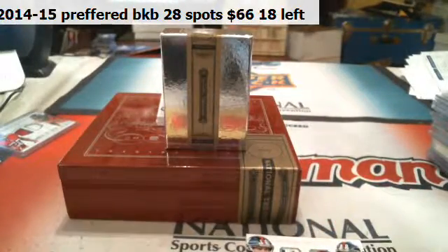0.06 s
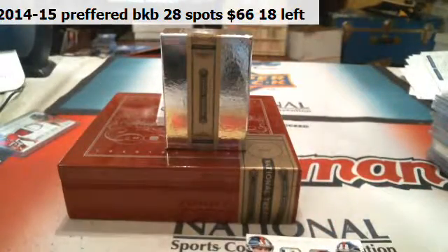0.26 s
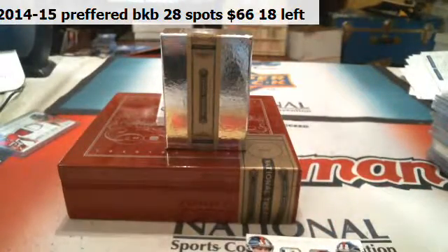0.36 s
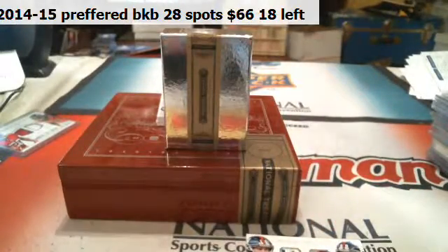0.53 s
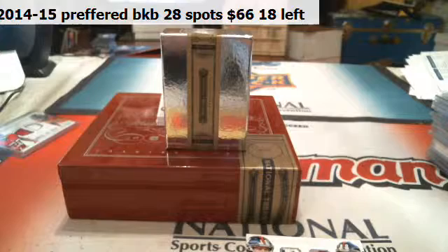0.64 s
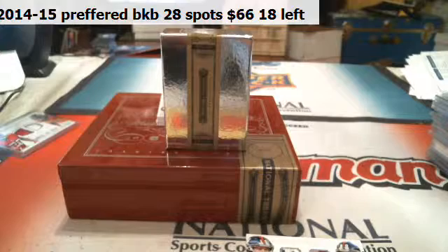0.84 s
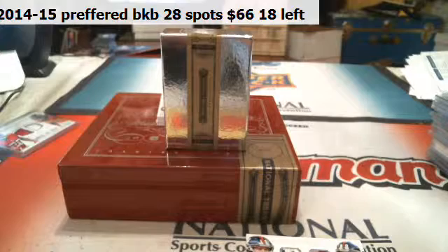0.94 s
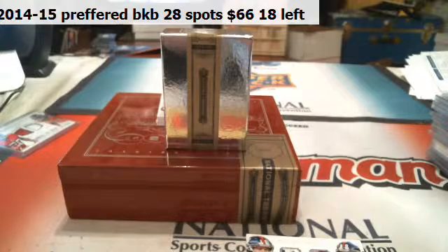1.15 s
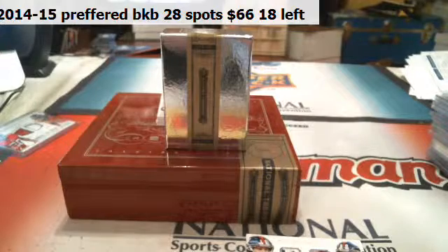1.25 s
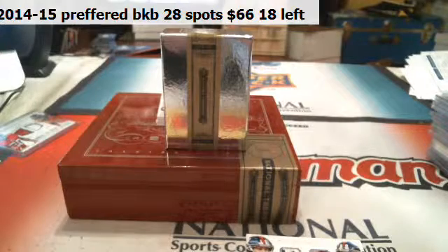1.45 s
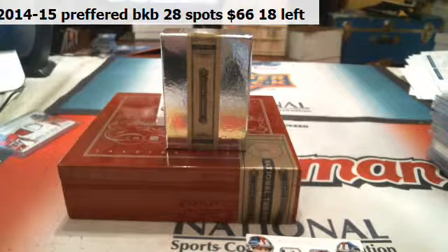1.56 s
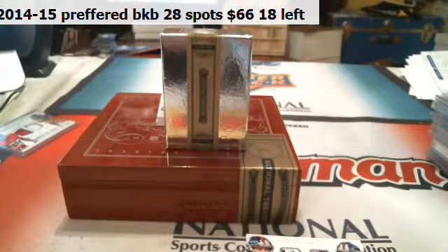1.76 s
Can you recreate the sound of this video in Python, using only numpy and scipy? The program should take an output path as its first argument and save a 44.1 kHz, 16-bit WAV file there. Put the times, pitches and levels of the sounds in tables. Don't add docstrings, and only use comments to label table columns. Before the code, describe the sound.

Thin plastic card sleeves crackle and snap as a hand shuffles them close up indoors

```python
import sys
import numpy as np
from scipy import signal
from scipy.fft import rfft, irfft
from scipy.io import wavfile

SR = 44100
rng = np.random.default_rng(int(sys.argv[2]) if len(sys.argv) > 2 else 0)


def wav_record(signal):
    frames = np.transpose(np.atleast_2d(signal))
    bounded = np.clip(frames, -1, 1)
    quanta = np.round(bounded * 32767).astype(np.int16)
    wavfile.write(sys.argv[1], SR, quanta)


def natural_amplitude(level_db):
    exponent = np.asarray(level_db, float) / 20
    return 10 ** exponent


N = 79380

# start_s, end_s
STROKE_TIMES = [(-.01, .012), (.14, .165), (.207, .26), (.26, .33), (.357, .438), (.438, .49), (.504, .533),
                (.535, .615), (.615, .66), (.71, .79), (.833, .88), (.88, .912), (.971, .99), (.99, 1.125),
                (1.124, 1.17), (1.17, 1.33), (1.33, 1.42), (1.423, 1.461), (1.5, 1.52), (1.532, 1.598),
                (1.6, 1.65), (1.786, 1.8), (.124, .14), (.165, .2)]
# pressure_at_start_db, pressure_at_end_db, lowest_ring_of_bent_sheet_hz
STROKE_FEEL = [(-38.5, -60, 214), (-51.5, -58, 660), (-58, -57, 2400), (-75.5, -58, 250),
               (-59.5, -41.5, 550), (-32, -42.5, 307), (-34.5, -38.5, 330), (-38, -59.5, 1300),
               (-72, -73, 2100), (-59.5, -64.5, 6300), (-60.5, -59.5, 1170), (-61.5, -65, 290),
               (-68, -63.5, 1400), (-60.5, -55, 1600), (-42.5, -48.5, 660), (-47, -50.5, 850),
               (-51.5, -51.5, 770), (-36, -57.5, 630), (-80, -58, 2600), (-39.5, -62, 2440),
               (-77, -85, 2500), (-74.5, -60.5, 470), (-74, -61, 1200), (-65, -70, 3000)]
RUB_DB = -5
TOP_HZ = 9980


def rms_one(x):
    return x / np.sqrt(np.mean(x ** 2) + 1e-20)


def peak_one(x):
    return x / np.abs(x).max()


def at_hz(points, hz):
    point_hz, point_db = np.array(points).T
    return np.interp(np.log(hz), np.log(point_hz), point_db)


def drift(rate_hz):
    r = np.exp(-2 * np.pi * rate_hz / SR)
    noise = rng.standard_normal(N + 4000)
    return rms_one(signal.lfilter([1], [1, -2 * r, r * r], noise)[4000:])


def resonate(x, hz, width_hz):
    r = np.exp(-np.pi * width_hz / SR)
    feed = np.array([1, 0, -1]) * (1 - r * r) / 2
    ring = [1, -2 * r * np.cos(2 * np.pi * hz / SR), r * r]
    return signal.lfilter(feed, ring, x + 1e-18)


def cut(x, hz, kind):
    return signal.sosfilt(signal.butter(2, hz, kind, fs=SR, output="sos"), x)


def snaps():
    # start_s, peak_db, ring_hz, treble_db, body_db
    film_snaps = [(0.141, -44, 1510, -14, -1), (0.153, -43.5, 837, -57, 11),
                  (0.207, -31, 3936, -28, -72), (0.231, -27.5, 7940, 4, -36),
                  (0.244, -34, 7400, 12, -15), (0.26, -38, 1240, -33, -8),
                  (0.283, -44.5, 2960, -14, -31), (0.291, -37.5, 6500, -23, -8.5),
                  (0.31, -45.5, 1140, 2, -62), (0.356, -34.5, 2530, -10.5, -4),
                  (0.365, -72, 5270, -12, -28.5), (0.376, -64.5, 2250, -22, -14),
                  (0.388, -31.5, 4500, -15, -10), (0.404, -30.5, 670, -5.5, 7),
                  (0.414, -34, 1750, -3.5, 3), (0.432, -29.5, 3830, -23.5, 11),
                  (0.443, -15.5, 3800, -22, 14.5), (0.443, -23.5, 1850, -7.5, -28.5),
                  (0.503, -18, 4660, -49, -35), (0.515, -28, 4600, -13, -4),
                  (0.518, -18.5, 2830, 7.5, 13), (0.522, -31, 504, 10.5, -32.5),
                  (0.5397, -24.5, 1860, -1.5, -34.5), (0.551, -26.5, 4800, 15, 6),
                  (0.5758, -21, 7030, -13, -17), (0.589, -33.5, 8300, -20, -4),
                     (0.595, -33.5, 850, 12.5, 11), (0.633, -40, 1770, 6, -18), (0.712, -45, 6840, 5, 1.5),
                     (0.748, -41.5, 2490, -5, -41), (0.772, -42.5, 7660, -33, -12),
                     (0.833, -50.5, 2310, -24, -1), (0.846, -39, 1175, 3.5, -3),
                     (0.873, -41.5, 2250, -7, -14), (0.973, -59, 4650, -22, -30),
                     (0.992, -41, 2000, 1, 4.5), (1.019, -46.5, 2050, -0.5, -13),
                     (1.035, -38, 770, -11, 12), (1.051, -47, 2070, -33, -32),
                     (1.058, -37.5, 2100, -9, -30), (1.077, -40.5, 2090, -24, -32.5),
                     (1.091, -37.5, 2100, -2.5, -11), (1.117, -39, 2220, -35.5, -16),
                     (1.126, -42, 2120, -36, 4), (1.145, -31.5, 2100, -39.5, 23),
                     (1.157, -27.5, 3380, -42, -3), (1.166, -38, 1450, -10.5, -18),
                     (1.181, -44, 8450, -13, -46),
                  (1.191, -20, 8670, 30, -35), (1.203, -31.5, 1600, -21.5, 11),
                      (1.218, -41, 1670, -16, -4), (1.23, -26.5, 7400, 14, -34),
                      (1.243, -29.5, 2150, -4, -4.5), (1.267, -35, 5840, -5, -32),
                      (1.284, -25, 5400, 8, -36), (1.3, -26, 1740, -38, 8), (1.312, -23, 2980, -43, 5.5),
                      (1.349, -37.5, 4740, -18, -2), (1.359, -30.5, 2220, -28, 2),
                      (1.365, -35, 3060, -12, 5), (1.423, -32, 2200, -0.5, -20),
                      (1.449, -34.5, 2970, -21, 3), (1.5, -42.5, 1580, 12, -21),
                      (1.534, -33, 1900, -2, -30), (1.544, -35, 5750, -37, -39),
                      (1.553, -34, 5500, -37, -44), (1.565, -34.5, 2300, -49, -44),
                      (1.584, -44, 2470, -36, -41), (1.592, -36.5, 2820, -13.5, -25)]
    decay_s, hold_s, after_db, after_s = .003, .0055, -17, .012
    clicks_per_s, fizz, first_click = 3000, .25, 2.0
    ring_q, body_hz, treble_hz = 5.56, 906, 4650
    broad_db, all_treble_db, all_body_db = 3.5, 10.5, 6.5
    creep_s = .0008
    size = 2048
    out = np.zeros(N + size)
    t = np.arange(size) / SR
    shape = np.exp(-t / decay_s - (t / hold_s) ** 4) + natural_amplitude(after_db) * np.exp(-t / after_s)
    for start_s, db, hz, treble_db, body_db in film_snaps:
        clicks = rng.random(size) < clicks_per_s / SR
        flurry = rng.standard_normal(size) * (fizz + clicks) * shape
        flurry[3] += first_click
        ring = resonate(resonate(flurry, hz, hz / ring_q), hz, 2 * hz / ring_q)
        band = [0.57 * hz, min(3.01 * hz, 15000)]
        broad = cut(cut(flurry, band, "band"), band, "band")
        treble = cut(flurry, [treble_hz, 1.2 * TOP_HZ], "band")
        body = resonate(flurry, body_hz, 1.48 * body_hz)
        snap = peak_one(ring) + natural_amplitude(broad_db) * peak_one(broad)
        snap = snap + natural_amplitude(all_treble_db + treble_db) * peak_one(treble)
        snap = snap + natural_amplitude(all_body_db + body_db) * peak_one(body)
        i = int((start_s + creep_s) * SR)
        out[i:i + size] += natural_amplitude(db) * peak_one(snap)
    return out[:N]


def pressure(t, start_s, end_s, start_db, end_db):
    grip_s, let_go_db_per_s = .004, 596
    grip = np.clip((t - start_s) / grip_s, 0, 1)
    hold_db = np.interp(t, [start_s, end_s], [start_db, end_db])
    return grip * natural_amplitude(hold_db - let_go_db_per_s * np.maximum(t - end_s, 0))


def fingers(hz):
    # pitch_hz, level_db
    film_colour = [(150, -40), (250, -3), (544, -13), (961, -13), (1790, -5), (3330, -3), (4470, -2),
                   (9230, 0), (15500, -36)]
    below_db_per_oct, above_db_per_oct, sheet_ring_db = 14.5, 4.5, -1.5
    hop = 16
    t, power = np.arange(0, N, hop) / SR, 0
    film = natural_amplitude(at_hz(film_colour, hz)) * np.sqrt(hz)
    for (start_s, end_s), (start_db, end_db, sheet_hz) in zip(STROKE_TIMES, STROKE_FEEL):
        gain = pressure(t, start_s, end_s, start_db, end_db)
        octaves = np.log2(hz / sheet_hz)
        slope_db = np.where(octaves < 0, below_db_per_oct, -above_db_per_oct) * octaves
        sheet = natural_amplitude(slope_db + sheet_ring_db * np.exp(-(octaves / 0.16) ** 2))
        power = power + np.outer(rms_one(sheet * film), gain) ** 2
    return np.repeat(np.sqrt(power), hop, axis=1)[:, :N]


def rustle():
    grains_per_s, grain_spread_db, grain_cycles = 5000, 2.8, 8.0
    clumps_per_s, clump_db = 70, 5
    pitches = np.geomspace(280, 14500, 24)
    gains = fingers(pitches)
    sizes = natural_amplitude(grain_spread_db * np.minimum(rng.exponential(1, N), 4)) * rng.choice([-1, 1], N)
    clump = drift(clumps_per_s)
    born = rng.random(N) < grains_per_s * natural_amplitude(clump_db * clump) / SR
    dealt = rng.integers(0, 24, N)
    bed = rng.standard_normal((2, N))
    out = 0
    for k, hz in enumerate(pitches):
        near = np.abs(dealt - k) < 2
        creases = sizes * born * near + 0.14 * bed[k % 2]
        width_hz = 4.18 * hz / grain_cycles
        grains = rms_one(resonate(resonate(creases, hz, width_hz), hz, width_hz))
        out = out + grains * gains[k] * natural_amplitude(2.0 * drift(28))
    return natural_amplitude(RUB_DB - 12.0) * out


def singing():
    # ring_hz, level_above_crackle_db
    sheet_songs = [(420, -7), (1400, -11), (1400, -12), (1220, 0), (1700, -10), (1753, -3.5), (482, -7.5),
                   (900, -7), (1700, -3), (2400, -5.5), (2200, -3), (764, -3.5), (4600, -2), (2100, -2),
                   (2100, -7.5), (2100, -8), (2300, -9), (1770, -10), (1650, -29), (2300, -1), (3120, -10),
                   (1200, -19), (4420, -3), (4000, -10)]
    ring_q = 7.0
    t, out = np.arange(N) / SR, 0
    slips = rng.standard_normal(N) * natural_amplitude(3.5 * drift(110))
    for (start_s, end_s), (start_db, end_db, _), (hz, db) in zip(STROKE_TIMES, STROKE_FEEL, sheet_songs):
        ring = rms_one(resonate(resonate(slips, hz, hz / ring_q), hz, 2 * hz / ring_q))
        out = out + natural_amplitude(RUB_DB + db) * pressure(t, start_s, end_s, start_db, end_db) * ring
    return out


def ticks():
    # start_s, peak_db, ring_hz
    kinks = [(.004, -56.5, 380), (.216, -64, 1400), (0.2337, -51, 6750), (0.236, -38, 7800),
             (0.284, -50.5, 1200), (0.292, -58, 1400), (0.314, -61, 308), (.329, -71, 1200),
             (0.336, -55, 1310), (.364, -55, 407), (.366, -40, 3600), (0.376, -50, 2350),
             (0.518, -36.5, 328), (.586, -52, 820), (.604, -48, 970), (.614, -52, 750), (.648, -63, 1700),
             (0.658, -55, 7130), (.671, -66, 2200), (.749, -59, 1080), (0.767, -57.5, 1120),
             (.786, -57, 2400), (0.837, -64.5, 537), (.892, -53.5, 710), (.899, -55.5, 1930),
             (.948, -64, 7700), (0.997, -53, 1400), (1.001, -50, 1970), (1.01, -50, 1520),
             (1.018, -52, 735), (1.029, -51, 2100), (1.067, -61, 2100), (1.105, -53, 2100),
             (1.146, -47.5, 280), (1.196, -50, 586), (1.205, -51, 532), (1.271, -47, 1700),
             (1.286, -46, 2100), (1.322, -55, 1510), (1.346, -41.5, 1700), (1.385, -57, 776),
             (1.425, -37.5, 1860), (1.434, -45, 980), (1.446, -53.5, 650), (1.458, -47, 2500),
             (1.51, -66, 1580), (1.533, -49.5, 1306), (1.541, -56.5, 420), (1.556, -39.5, 2880),
             (1.638, -59.5, 3180), (1.68, -64, 565), (1.686, -53.5, 531), (1.705, -57.5, 515),
             (1.714, -68, 1987), (.152, -54, 900)]
    puff_s, ring_q, widens_hz = 0.00091, 4.5, 4000
    swell_cycles = 1.2
    size = 2048
    out = np.zeros(N + size)
    t = np.arange(size) / SR
    for start_s, db, hz in kinks:
        puff = (1 + rng.standard_normal(size)) * np.exp(-t / puff_s) * np.cos(2 * np.pi * hz * t)
        width_hz = hz / ring_q * (1 + hz / widens_hz)
        tick = resonate(resonate(puff, hz, width_hz), hz, 2 * width_hz)
        i = max(int((start_s - swell_cycles / hz) * SR), 0)
        out[i:i + size] += natural_amplitude(db) * peak_one(tick)
    return out[:N]


def room(x):
    level_db, t60_s, gap_s = -15, .12, .004
    t = np.arange(SR // 4) / SR
    tail = rng.standard_normal(len(t)) * natural_amplitude(-60 * t / t60_s) * (t > gap_s)
    tail = tail / np.sqrt(np.sum(tail ** 2))
    return natural_amplitude(level_db) * signal.fftconvolve(x, tail)[:N]


def air():
    # pitch_hz, level_db (per Hz)
    air_colour = [(30, -8.5), (70, 3), (250, 8), (330, 6), (450, -4.5), (1500, -8.5), (6000, -23.5),
                  (14000, -28.5)]
    air_db, hum_hz, hum_db = -73.5, 120, -79
    hz = np.maximum(np.fft.rfftfreq(N, 1 / SR), 1)
    white = rfft(rng.standard_normal(N))
    noise = rms_one(irfft(white * natural_amplitude(at_hz(air_colour, hz)), N))
    hum = np.sqrt(2) * np.sin(2 * np.pi * hum_hz * np.arange(N) / SR)
    hum = hum * natural_amplitude(0.5 * drift(8.5))
    return natural_amplitude(air_db) * noise + natural_amplitude(hum_db) * hum


def scene():
    thin_hz = 300
    cards = snaps() + rustle() + ticks() + singing()
    cards = cut(cut(cards, thin_hz, "high"), thin_hz, "high")
    return (cards + room(cards) + air())[None]


def low_pass(x):
    return signal.sosfilt(signal.butter(12, 16240, fs=SR, output="sos"), x)


def record(dry):
    dull = signal.sosfilt(signal.butter(3, TOP_HZ, fs=SR, output="sos"), dry)
    return low_pass(dull)


dry = scene()
out = record(dry)
wav_record(out)
```